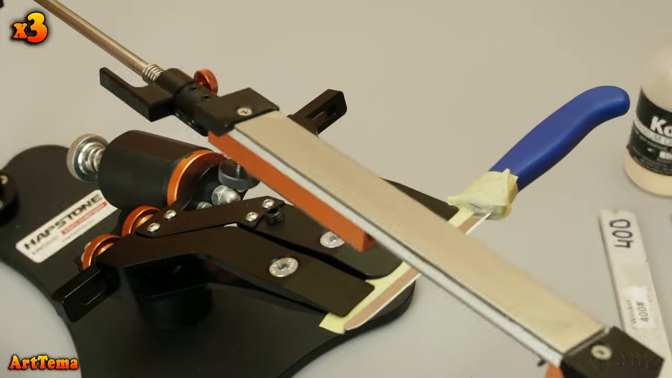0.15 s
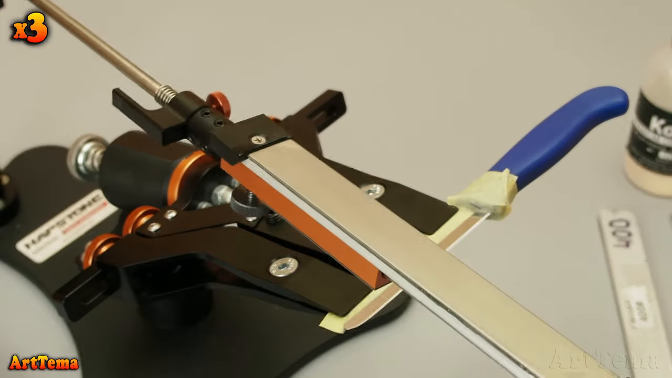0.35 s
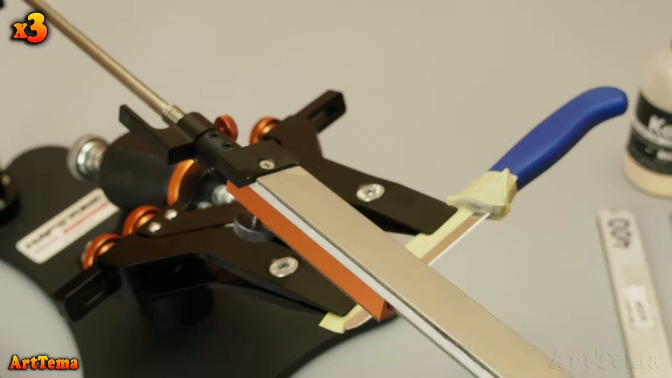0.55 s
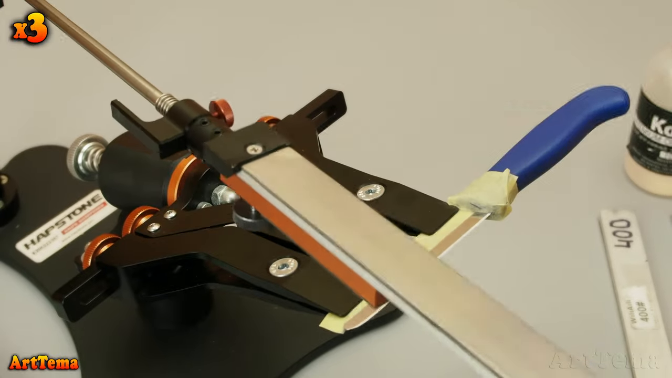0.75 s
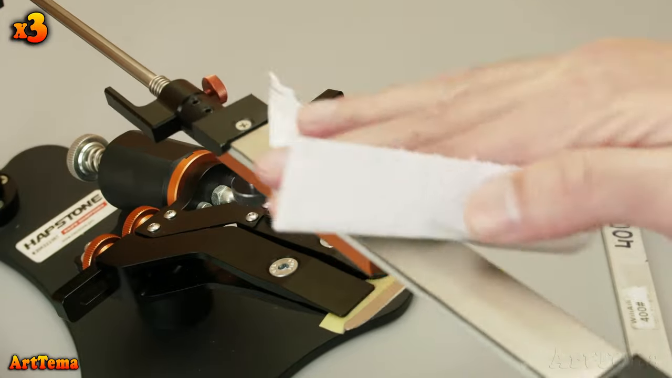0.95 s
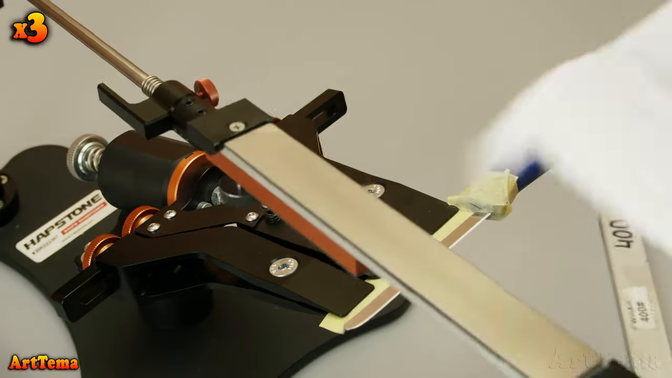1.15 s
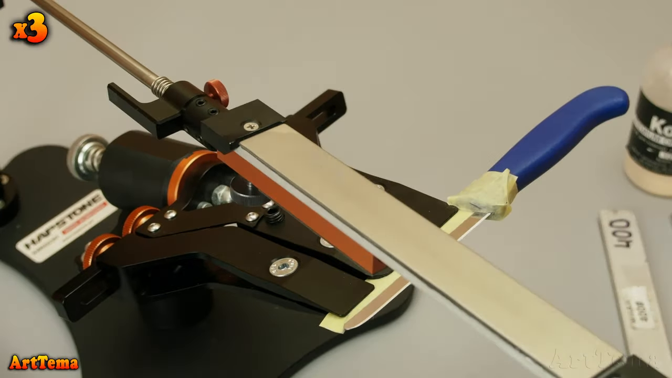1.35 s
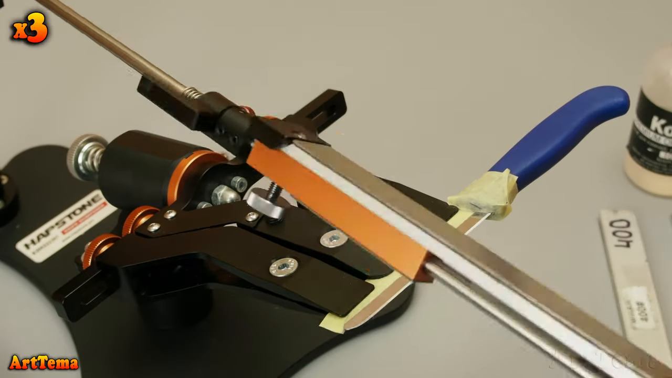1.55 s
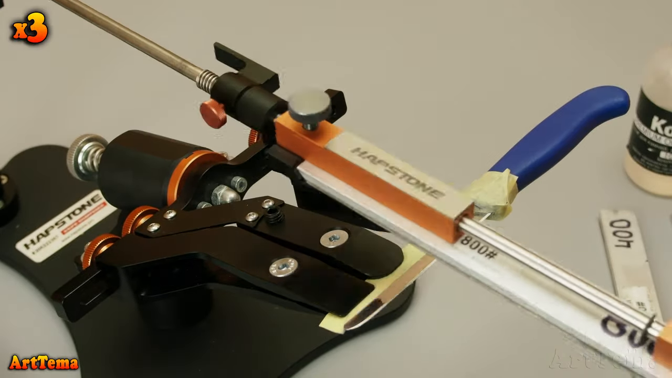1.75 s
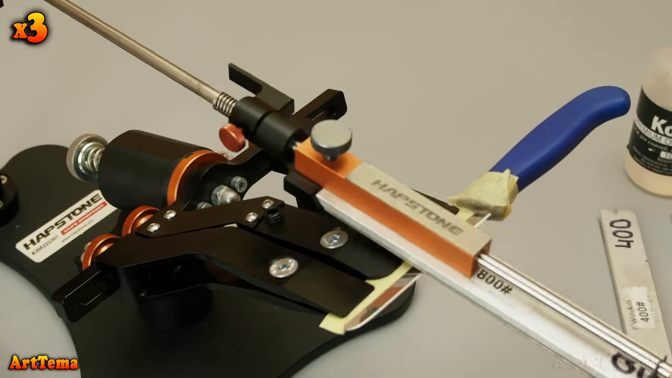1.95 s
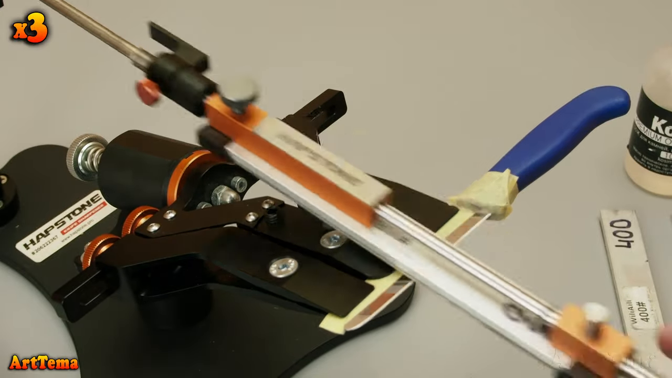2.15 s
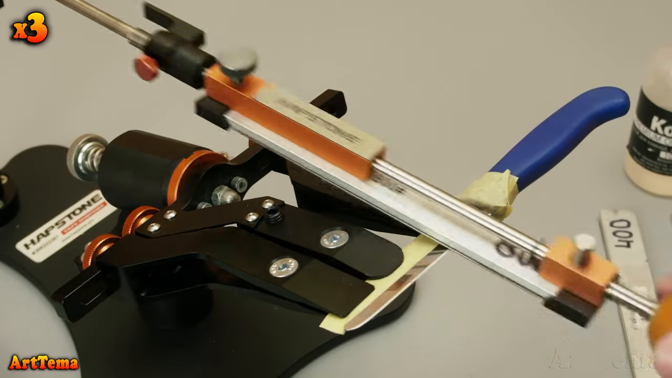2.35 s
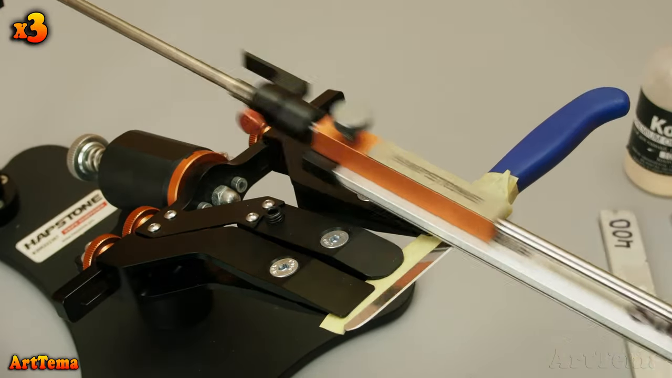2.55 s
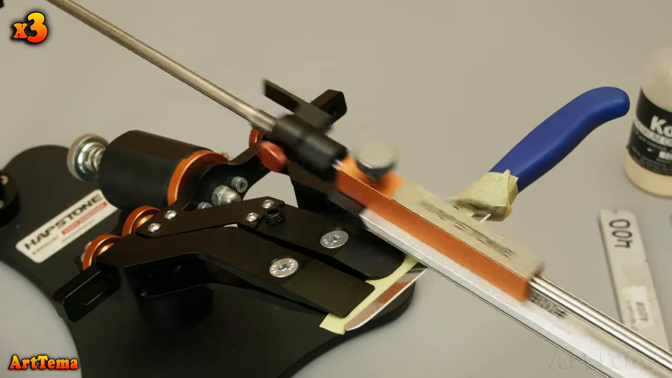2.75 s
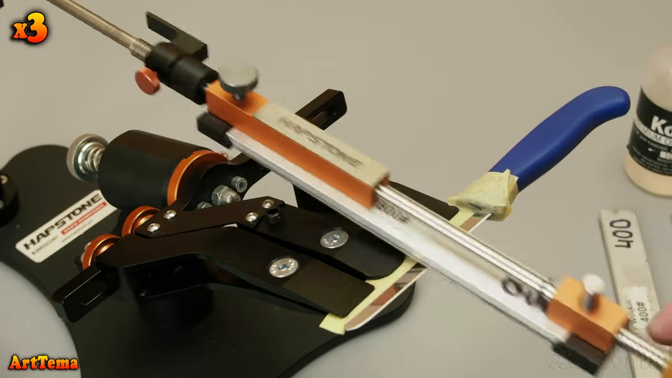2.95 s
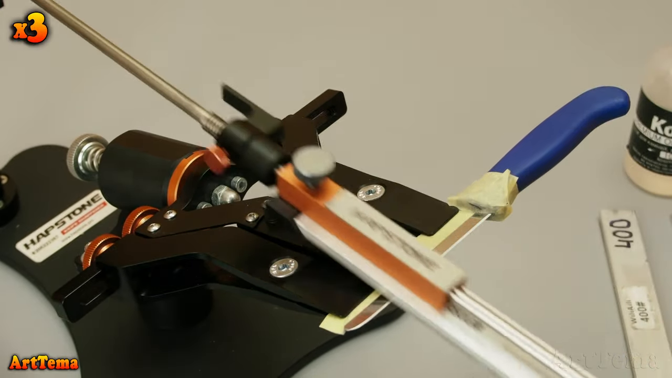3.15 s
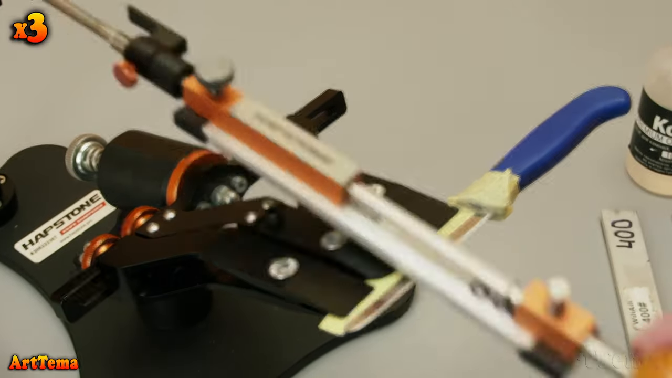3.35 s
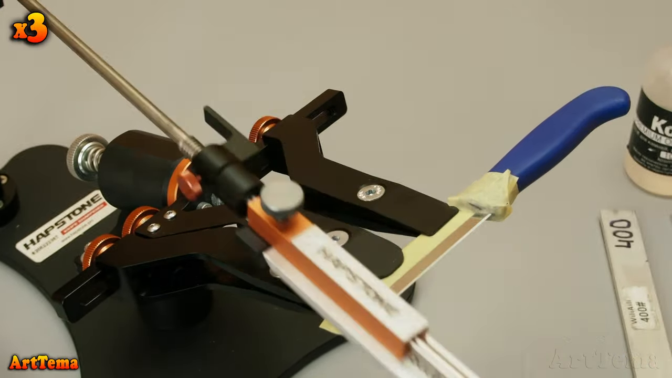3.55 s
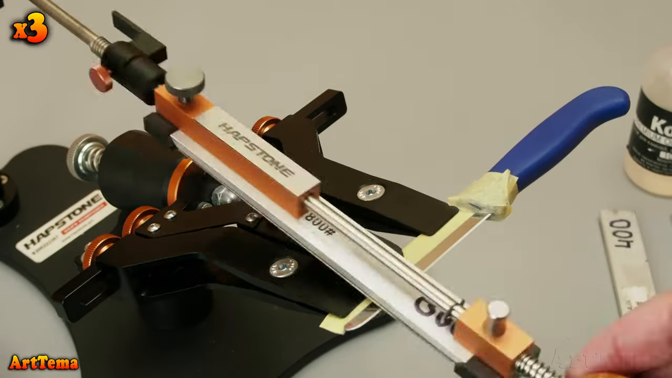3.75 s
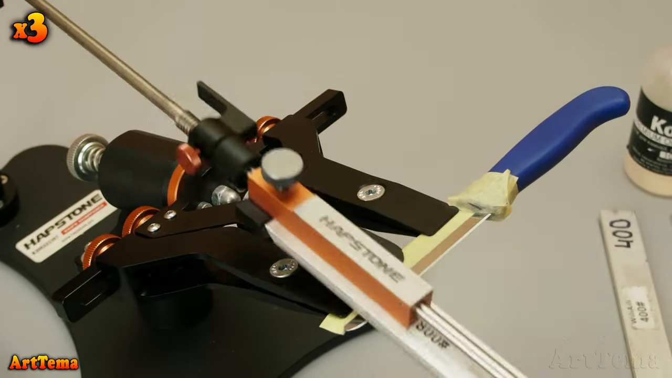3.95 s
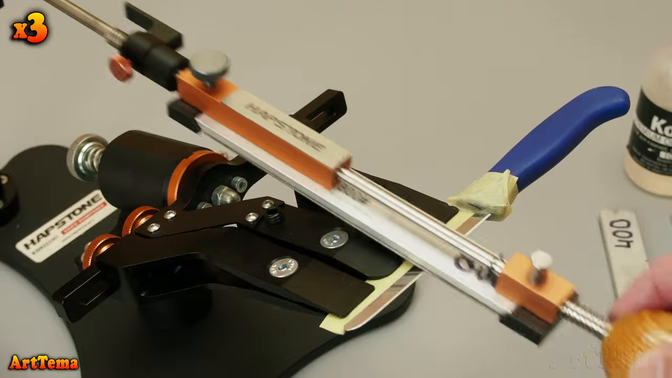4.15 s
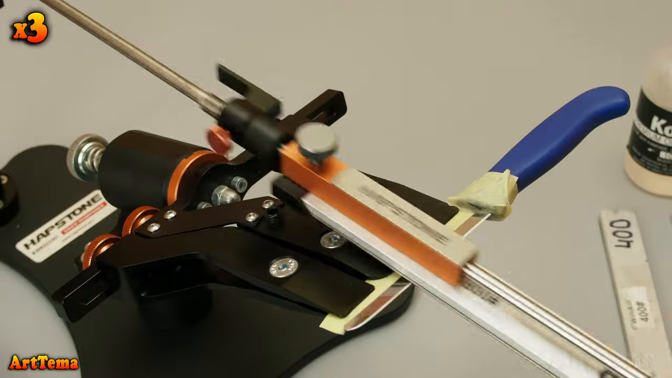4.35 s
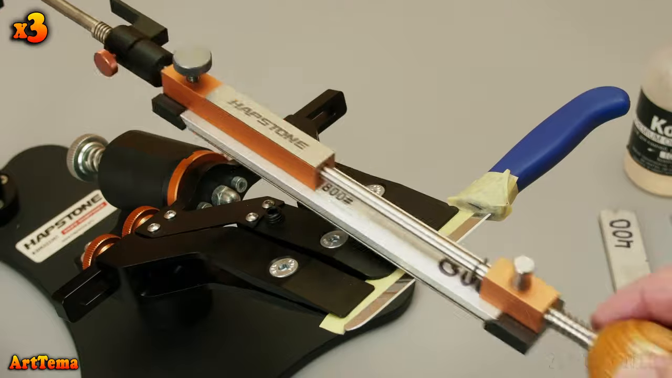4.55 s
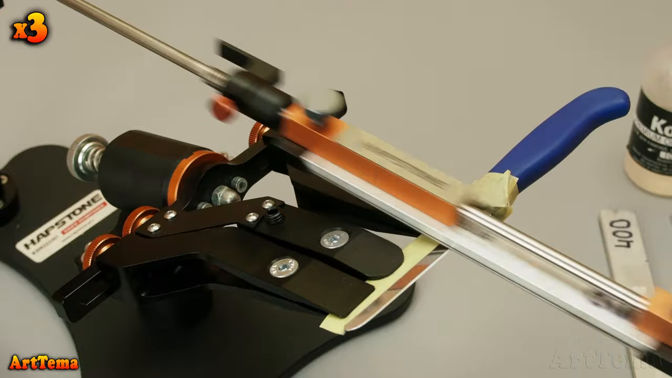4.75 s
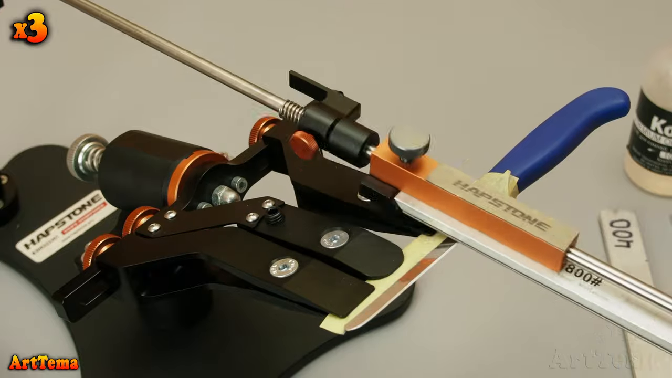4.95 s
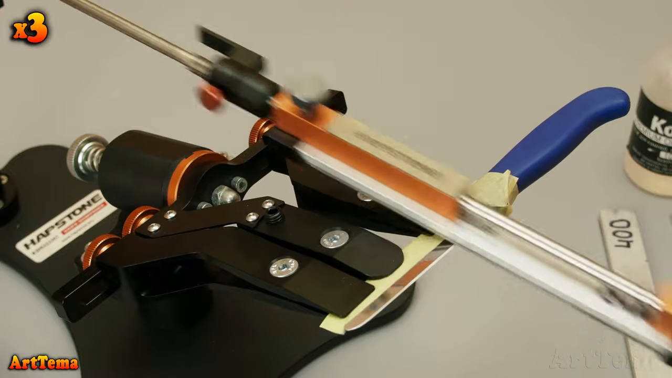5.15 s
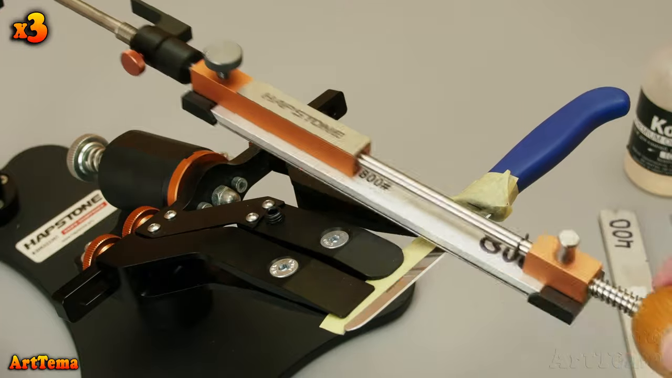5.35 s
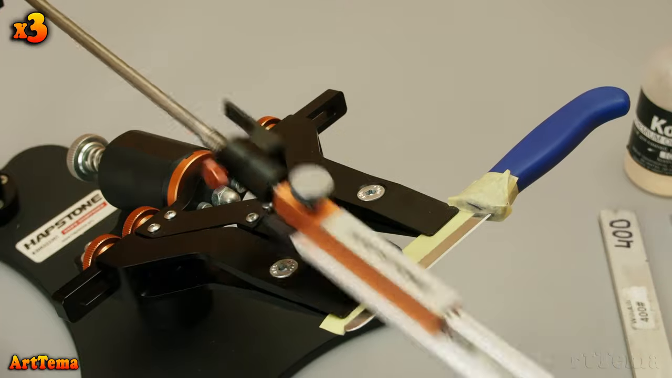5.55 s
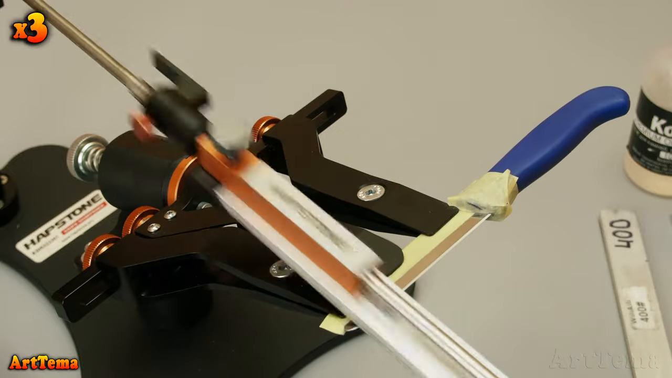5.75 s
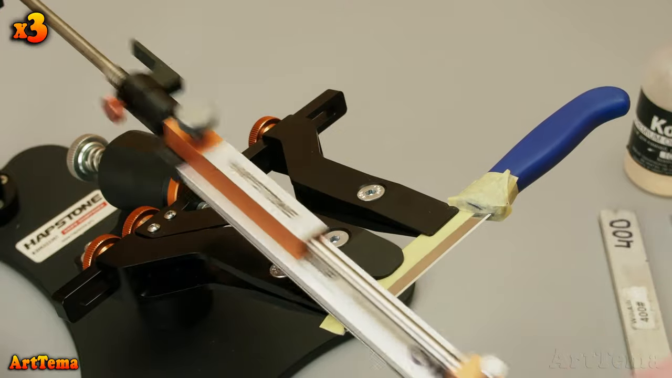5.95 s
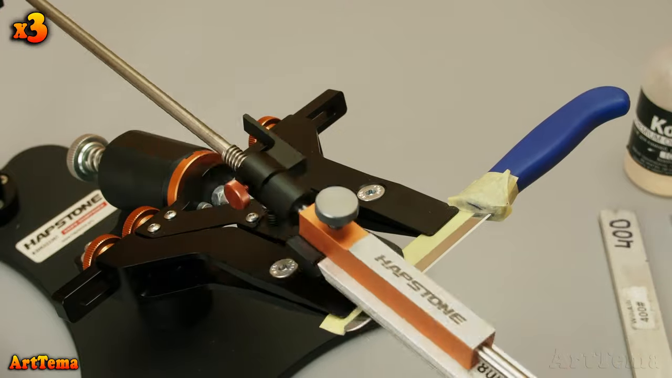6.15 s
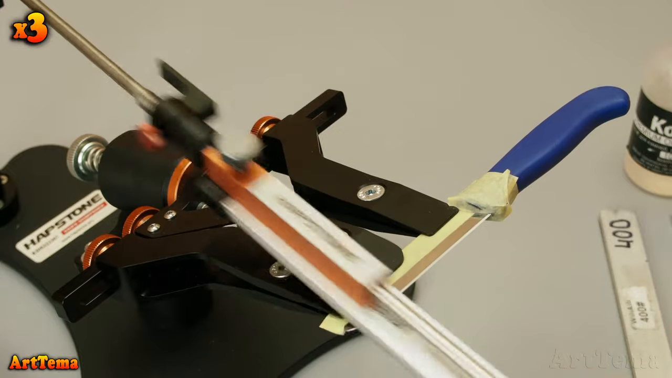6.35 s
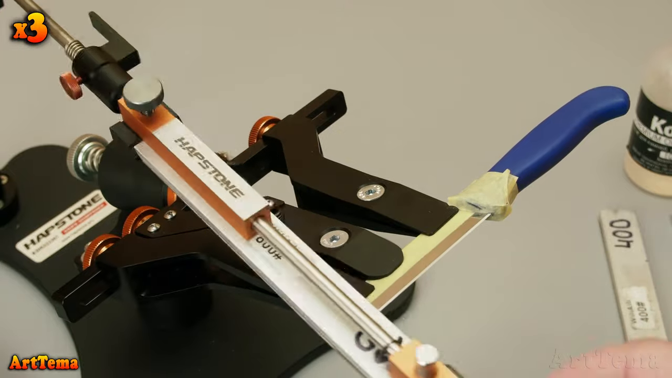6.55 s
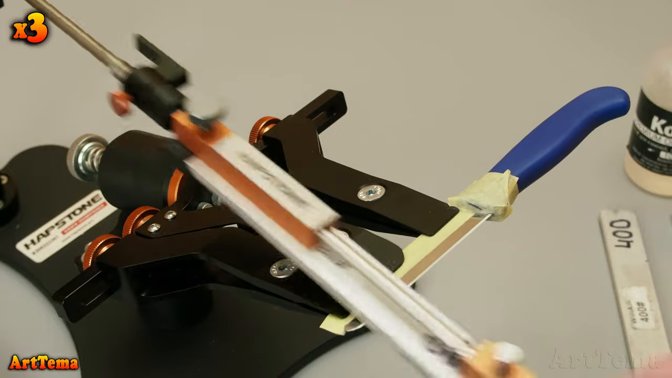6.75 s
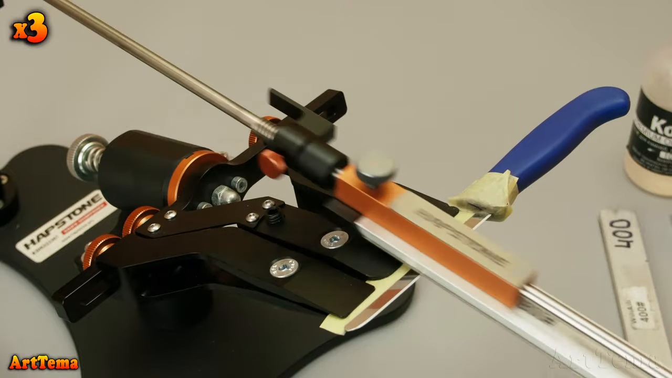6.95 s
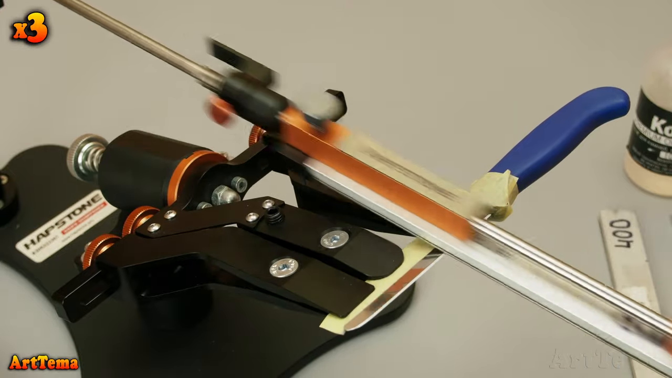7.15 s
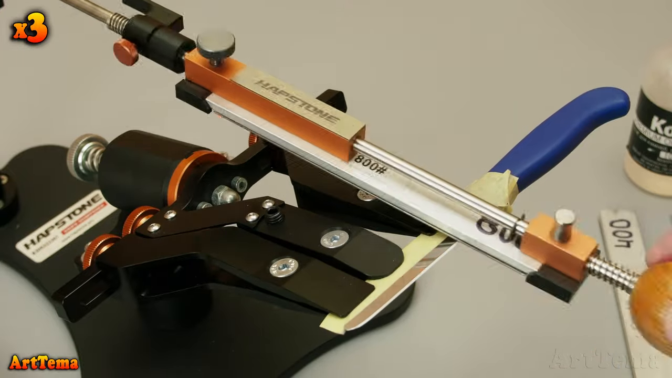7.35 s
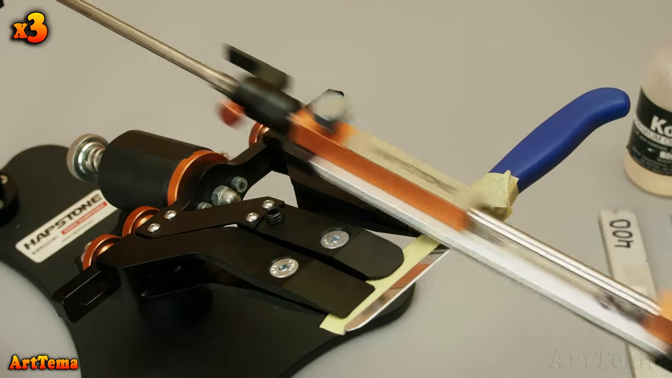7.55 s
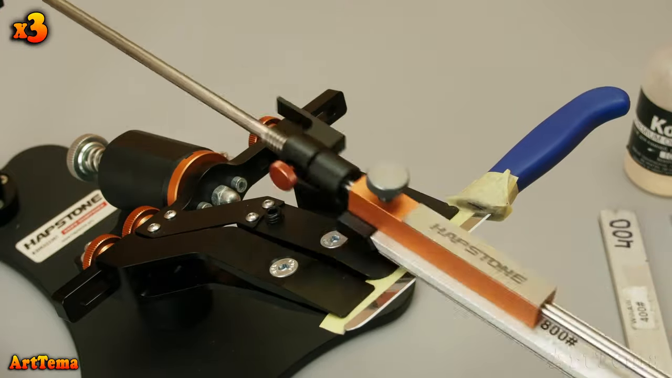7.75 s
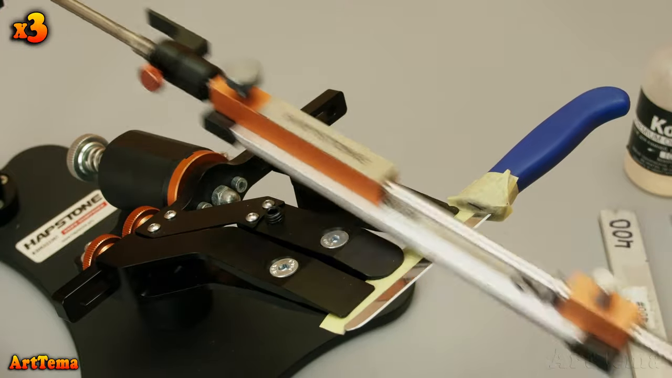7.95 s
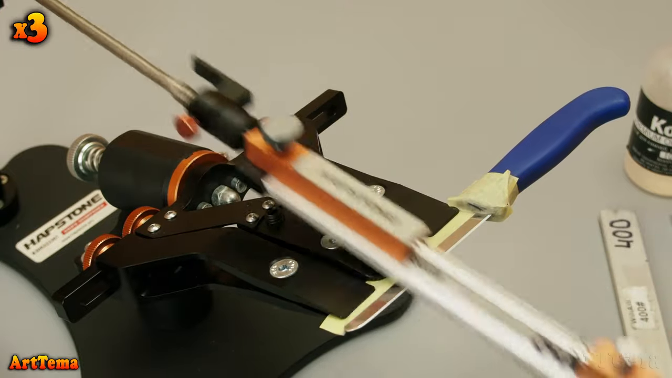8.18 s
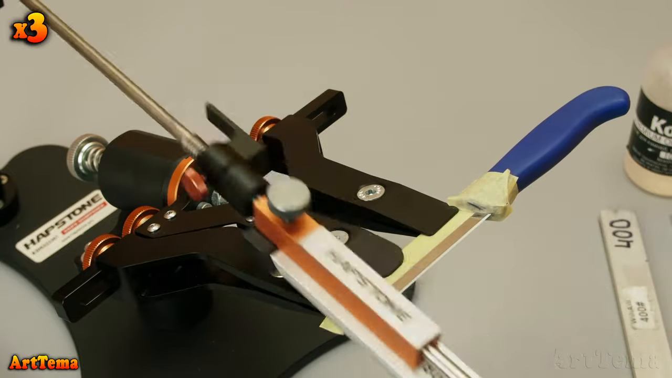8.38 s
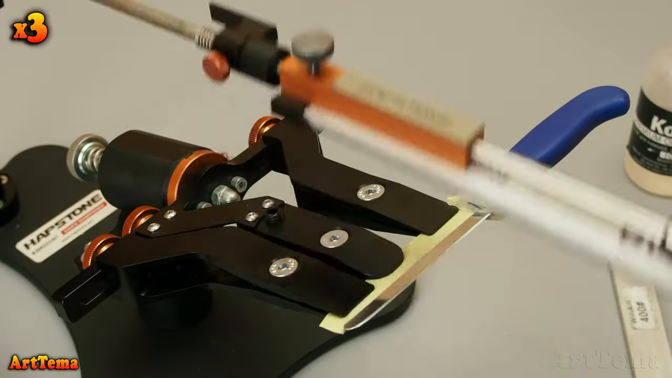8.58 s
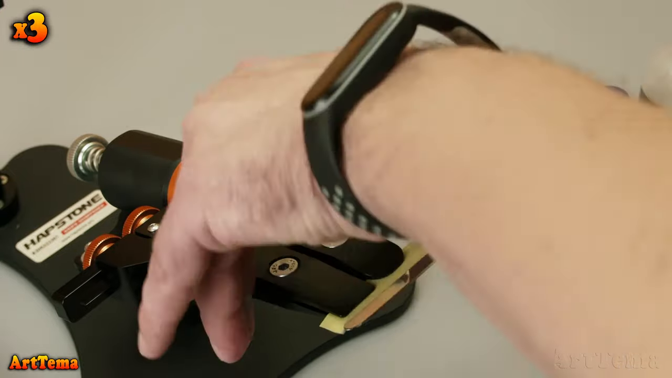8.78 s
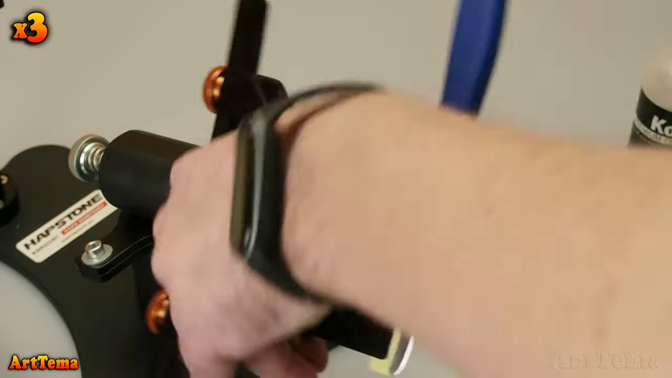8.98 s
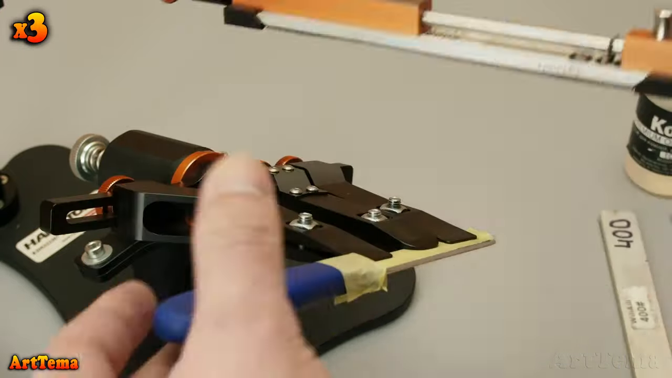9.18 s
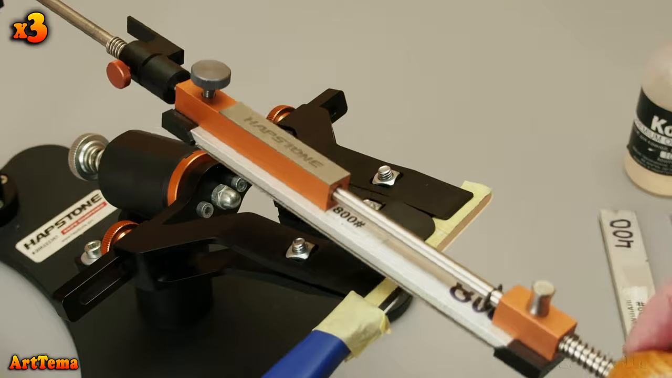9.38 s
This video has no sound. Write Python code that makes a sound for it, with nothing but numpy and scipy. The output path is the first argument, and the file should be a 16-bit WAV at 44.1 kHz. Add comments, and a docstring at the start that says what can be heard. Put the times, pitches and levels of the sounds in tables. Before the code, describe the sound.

A small quiet room with a low hush, heard close up in stereo at a workbench. For the first two seconds a cloth wipes faintly over a sharpening stone, with a few tiny ticks. At about 2 seconds the stone is set down on a clamped knife with a dull knock and starts rasping quickly back and forth, roughly thirteen short strokes a second. The gritty, hissing scrape is strongest at first, then swells and eases, with a thin, shifting ring from the steel blade. Underneath, the jig rumbles and knocks softly through the bench, and the hollow clamp gives brief low hums, mostly between 5 and 8 seconds. A sharp tick comes near 7.6 seconds. The strokes stop at about 8.6 seconds, followed by a small click and soft bumps. At about 9.4 seconds the turned clamp locks with a clack and thump, the loudest sound.

```python
"""A workbench in a small quiet room, heard from a close pair of microphones.
A stone on a guide rod is wiped with a cloth, set down on a clamped knife and worked quickly to and fro.
Grit rasps on steel and sets the blade ringing; the jig rumbles and knocks through the bench and jolts
the hollow clamp into short hums. At the end the clamp is turned over with a clack and a thump."""
import sys
import numpy as np
from scipy import signal
from scipy.fft import rfft, irfft, next_fast_len
from scipy.io import wavfile

SR = 44100
rng = np.random.default_rng(int(sys.argv[2]) if len(sys.argv) > 2 else 0)


def wav_record(signal):
    """Record a signal, one row per channel, as 16-bit PCM in the file named by sys.argv[1]."""
    frames = np.transpose(np.atleast_2d(signal))
    bounded = np.clip(frames, -1, 1)
    # unit amplitude maps onto the largest positive 16-bit level
    quanta = np.round(bounded * 32767).astype(np.int16)
    wavfile.write(sys.argv[1], SR, quanta)


N = 415422
TIME = np.arange(N) / SR
FFT_SIZE = next_fast_len(N + SR // 2)
LOG_HZ = np.log(np.maximum(np.arange(FFT_SIZE // 2 + 1) * SR / FFT_SIZE, 1))


def from_db(db):
    """Decibels to gain."""
    return np.exp(np.asarray(db) * np.log(10) / 20)


def unit_rms(x):
    """Scale to unit power."""
    return x / np.sqrt(np.mean(x ** 2) + 1e-20)


def over_time(rows):
    """Each level column as one value per sample; silence outside the table."""
    times, *columns = np.transpose(rows)
    return [np.interp(TIME, times, db, left=-200, right=-200) for db in columns]


def over_hz(rows):
    """A spectrum table as one value per FFT bin."""
    hz, value = np.transpose(rows)
    return np.interp(LOG_HZ, np.log(hz), value)


def shaped(x, response):
    """Filter by a frequency response."""
    return irfft(rfft(x, FFT_SIZE) * response, FFT_SIZE)[..., :N]


def filtered(x, kind, hz, order=4):
    """Butterworth filter."""
    return signal.sosfilt(signal.butter(order, hz, kind, fs=SR, output="sos"), x)


def drift(rate_hz):
    """A slow random wander with spread 1."""
    hop, settle = 40, 2000
    pole = np.exp(-2 * np.pi * rate_hz * hop / SR)
    noise = rng.standard_normal(N // hop + settle + 2)
    slow = signal.lfilter([1], [1, -2 * pole, pole * pole], noise)[settle:]
    return np.interp(np.arange(N) / hop, np.arange(len(slow)), unit_rms(slow))


def grains(uneven_db):
    """Dense tiny contacts of uneven size."""
    return unit_rms(rng.standard_normal(N) * from_db(uneven_db * np.minimum(rng.exponential(1, N), 5)))


def ring(force, hz, t60):
    """One mode: a unit click starts a dying sine of height 1."""
    r, w = from_db(-60 / (t60 * SR)), 2 * np.pi * hz / SR
    return signal.lfilter([0, np.sin(w)], [1, -2 * r * np.cos(w), r * r], force + 1e-18)


def ring_by_stroke(force, starts, pitches_hz, t60):
    """A mode that takes a new pitch on each stroke, always at unit power."""
    out, at = np.zeros_like(force), [round(start * SR) for start in starts]
    for begin, end, hz in zip(at, at[1:], pitches_hz):
        out[:, begin:end] = unit_rms(ring(force[:, begin:end], hz, t60))
    return out


def swelling_ring(times, db, hz, t60):
    """Jolts reach a resonance through another part, so the ring swells before it dies."""
    jolts = np.zeros(N)
    jolts[np.round(np.asarray(times) * SR).astype(int)] = from_db(db)
    peak = t60 * SR / (2 * np.e * np.log(1000))
    return ring(ring(jolts, hz, t60), hz, t60) / peak


# Strokes, close up; the stone lifts at the last row. Table levels are before each source's own gains.
# t/s, rasp/dB, hiss over the rasp/dB, rubbing at the opening turn/dB
STROKES = [(2.09, -44, -13, -65), (2.171, -34.5, 0.5, -51.5), (2.263, -31.5, 1, -44), (2.347, -44, 0, -49),
           (2.425, -47.5, -1.5, -57), (2.502, -53, -1.5, -62), (2.582, -50.5, 1, -60.5),
           (2.661, -53.5, -2, -56), (2.745, -42.5, -2.5, -55.5), (2.825, -44.5, -3, -55),
           (2.904, -48, 3, -74), (2.985, -47, 0.5, -57), (3.052, -49, -1.5, -66), (3.12, -50.5, -5.5, -66),
           (3.184, -53.5, 2, -63), (3.257, -50, 0, -59.5), (3.319, -49, -4.5, -58), (3.386, -50, -4, -46.5),
           (3.449, -56, 5, -59.5), (3.519, -62, 2, -52.5), (3.58, -65.5, 6.5, -72),
           (3.65, -60.5, -1.5, -60.5), (3.711, -55.5, -1, -79), (3.771, -47, -10.5, -54),
           (3.837, -57, -2, -68.5), (3.901, -54, -5, -53), (3.969, -54.5, -1, -59.5),
           (4.035, -52.5, 0.5, -59), (4.099, -53, 2, -54.5), (4.164, -46, -5, -65),
           (4.226, -45.5, 0.5, -57), (4.29, -52, 1, -57), (4.359, -48, 3, -54.5), (4.428, -47.5, -4, -60),
           (4.501, -42.5, 2.5, -54.5), (4.578, -48, -2.5, -54), (4.645, -44, -3, -60.5),
           (4.721, -51.5, 3, -59), (4.793, -53, 2.5, -58.5), (4.878, -59.5, 1.5, -60),
           (4.961, -57.5, 3, -64), (5.042, -61, 3.5, -70), (5.12, -49.5, 2, -73), (5.198, -52.5, -1, -56.5),
           (5.278, -44, 3, -58.5), (5.353, -50, -0.5, -58.5), (5.435, -47.5, 0, -65),
           (5.508, -50, -3.5, -61), (5.581, -51, 2, -57), (5.657, -54, -3, -58), (5.731, -58, 1, -65.5),
           (5.806, -55, 1, -61), (5.872, -67.5, 10.5, -74), (5.945, -65, 2.5, -67),
           (6.019, -62.5, 0.5, -61.5), (6.087, -64, -0.5, -63.5), (6.167, -53, 5.5, -67.5),
           (6.243, -54, -1, -64.5), (6.318, -53.5, -2.5, -58), (6.403, -48.5, -3.5, -67),
           (6.485, -50.5, -1, -57), (6.565, -50.5, -5, -62.5), (6.648, -51, 2.5, -60.5),
           (6.732, -54.5, 0, -61.5), (6.812, -50, 0.5, -63.0), (6.894, -56, 5, -59),
           (6.973, -44.5, -0.5, -62), (7.053, -51.5, 3.5, -58.5), (7.126, -44, -2, -62),
           (7.209, -56, 3, -61), (7.284, -55, 1, -64), (7.369, -56, -3, -62), (7.446, -50.5, -2, -66),
           (7.525, -53.5, -4, -63), (7.602, -44, 0, -68), (7.68, -51.5, -1.5, -60), (7.76, -46, 1, -67),
           (7.838, -51, 0, -54.5), (7.911, -46.5, 1, -65.5), (7.995, -49.5, 0.5, -56),
           (8.07, -47.5, 0, -61.5), (8.151, -52.5, -1, -59), (8.232, -48.5, -5.5, -62.5),
           (8.311, -55, -3, -60), (8.385, -47.5, 0, -60.5), (8.463, -57, 0.5, -54), (8.541, -50, -4.5, -66),
           (8.609, -76.5, -3, -56)]
JIG_SCRAPE = [(2.05, -68), (2.6, -58), (3.1, -60), (3.6, -65), (4.1, -63), (4.7, -62.5), (5.1, -53.5),
              (5.5, -61.5), (5.8, -61), (6.3, -61), (7.1, -59), (7.6, -59), (8.65, -62)]   # scrape under a usual stroke, along the blade: t/s, level/dB
GRIT_SPECTRUM = [(350, 3.5), (700, -2.5), (1150, 17.5), (1600, -12.5), (2400, 3), (3300, 16), (4950, -2),
                 (5500, 14), (9000, 3), (15700, 0)]   # grit on steel: f/Hz, level/dB
BAND_EDGES = [550, 1900, 4600, 8500, 17000]   # bounds of grind, scrape, rasp and hiss: f/Hz
BAND_CHATTER = [4, 3, 2.2, 2.8]   # lumpiness of each band: spread/dB
BAND_RUBBING = [-29, -1.5, -1.5, -7]   # each band's share of the dull rubbing at a turn: level/dB


def stone(jolts):
    """Grit rasps on steel, loud while the stone moves and sinking to a rub at each turn."""
    starts, rasp_db, hiss_db, turn_db = np.transpose(STROKES)
    usual_scrape_db, usual_rasp_db = np.interp(starts, *np.transpose(JIG_SCRAPE)), -52
    scrape_db = usual_scrape_db + .23 * (rasp_db - usual_rasp_db) - .59 * hiss_db
    bands_db = [scrape_db - 11.5, scrape_db, rasp_db, rasp_db + hiss_db]
    stroke = np.clip(np.searchsorted(starts, TIME) - 1, 0, len(starts) - 2)
    progress = (TIME - starts[stroke]) / np.diff(starts)[stroke]
    touching = (progress > 0) & (progress < 1)
    speed = np.clip(1.5 * np.sin(np.pi * progress) - .18, 0, 1)   # sticks at the turn, then breaks free
    # a stroke leans towards the end where the stone keeps its weight
    lean_db = .84 * np.diff(turn_db)[stroke] * (progress - .5)
    rubbing = from_db(np.interp(TIME, starts, turn_db) - 4) * touching
    # a wide contact patch: in the treble each microphone favours other grains
    side_grit = filtered(grains(uneven_db=2.5), "high", 2600, order=2)
    grit = grains(uneven_db=4.5) + from_db(-4) * side_grit * [[1], [-1]]
    # the thin edge takes up little bass, and is driven out of step with the surface hiss
    edge_force = filtered(np.roll(grit, SR, axis=1), "high", 600)
    steel = unit_rms(shaped(grit, from_db(over_hz(GRIT_SPECTRUM))))
    steel += lesser_modes(edge_force, starts, stroke) + blade(edge_force, starts, stroke)
    out = np.zeros((2, N))
    for k, band_hz in enumerate(zip(BAND_EDGES, BAND_EDGES[1:])):
        chatter_db = BAND_CHATTER[k] * (drift(15) if k else jolts)
        sliding = from_db(bands_db[k][stroke] + lean_db + chatter_db) * speed * touching
        envelope = np.hypot(sliding, rubbing * from_db(BAND_RUBBING[k]))
        out += unit_rms(filtered(steel, "band", band_hz)) * envelope
    return out


# The clamped blade's modes: f/Hz, width/Hz, level/dB, family (0 heel, 1 belly, 2 high)
BLADE_MODES = [(2230, 37, -18, 1), (2263, 43, -11.5, 0), (3340, 150, 0, 1), (3780, 47, -3, 0),
               (4050, 80, -7, 0), (4430, 280, -6.5, 0), (4460, 200, -12, 1), (5710, 120, -5, 1),
               (5960, 140, 4.5, 0), (6500, 66, -7.5, 0), (10040, 350, -17, 0), (7320, 140, -7, 2),
               (8580, 200, -11.5, 2), (9440, 190, 1.5, 2), (9760, 120, -0.5, 2), (12400, 280, -9, 2)]
FAMILY_RINGING = [(2.05, -15, -8, 6), (2.5, -7.5, 8.5, -10.5), (3.2, -21, -9, -4.5), (3.6, 20, -5, 3.5),
                  (4.1, -3, -30, -10), (4.6, -12.5, -7, -3.5), (5.0, 9.5, 13.5, -18.5),
                  (5.6, -13.5, -8, -4.5), (5.8, 19.5, -14.5, 0), (6.4, 9.5, -30, -2.5),
                  (6.9, 3.5, -19.5, -10.5), (7.3, -1.5, 17, -13), (7.9, -1, -14, -3.5),
                  (8.3, -4.5, -9.5, -0.5), (8.65, 6.5, -11.5, -13)]   # how freely each family rings: t/s, heel/dB, belly/dB, high/dB
FAMILY_DETUNE = [.007, .012, .012]   # pitch from stroke to stroke: spread/fraction
FAMILY_CONTACT = [2.5, 4, 3.5]   # contact from stroke to stroke: spread/dB


def blade(force, starts, stroke):
    """The blade's modes wax and wane as the stone wanders; each stroke meets the edge anew."""
    freedom = from_db(over_time(FAMILY_RINGING))
    out = np.zeros((2, N))
    for hz, width_hz, db, family in BLADE_MODES:
        pitches = hz * np.exp(rng.normal(0, FAMILY_DETUNE[family], len(starts)))
        mode = ring_by_stroke(force, starts, pitches, t60=np.log(1000) / (np.pi * width_hz))
        contact_db = 4 * drift(35) + rng.normal(0, FAMILY_CONTACT[family], len(starts))[stroke]
        out += mode * freedom[family] * from_db(db - 12.5 + contact_db)
    return out


def lesser_modes(force, starts, stroke):
    """Weaker blade modes flare briefly, at other pitches on every stroke."""
    ring_cycles = 55
    out = np.zeros((2, N))
    for hz in np.geomspace(1300, 13000, 14):
        db = np.interp(np.log(hz), np.log([1300, 3500, 13000]), [-29, -14, -21])
        flare_db = 9 * np.tanh(.5 * drift(30) + rng.normal(0, .4, len(starts))[stroke])
        pitches = hz * np.exp(rng.normal(0, .07, len(starts)))
        out += ring_by_stroke(force, starts, pitches, t60=ring_cycles / hz) * from_db(db + flare_db)
    return out


BENCH_MODES = [(71.3, -19, 0.15), (108, 1, 0.1), (135, 4.5, 0.078), (208.3, 1, 0.07), (258.3, -8, 0.13),
               (328.8, 6, 0.06), (417, 6.5, 0.02), (494, -3.5, 0.093), (628, -1.5, 0.027),
               (780, -16, 0.024), (960, -29.5, 0.069)]   # the bench under the jig: f/Hz, level/dB, t60/s
JIG_RUMBLE = [(.5, -80), (.8, -78), (1.4, -97), (2.0, -65), (2.4, -61.5), (3.7, -61), (4.3, -62.5),
              (5.0, -59.5), (5.9, -58), (6.8, -57), (7.2, -59), (8.4, -57), (8.7, -73.5), (9.42, -89.5)]   # the jig shaking the bench: t/s, level/dB
BENCH_KNOCKS = [(0.746, -57, -4), (1.206, -60, -2), (1.272, -70, -8), (1.292, -75, 15.5),
                (1.338, -78, 16.5), (1.467, -78.5, 21), (1.97, -23, -19.5), (2.178, -41, -26.5),
                (2.713, -42.5, -14.5), (2.786, -40, -31), (3.31, -41, -29), (3.441, -36, -30),
                (3.512, -38.5, -25), (3.637, -41, -19), (3.765, -49.5, 0.5), (3.895, -34.5, -24),
                (4.155, -38, -51), (4.287, -35.5, -52), (4.517, -47.5, -10), (4.906, -50, -13),
                (4.998, -38, -16.5), (5.082, -46, -2.5), (5.239, -37.5, -9.5), (5.716, -34.5, -54),
                (5.988, -35, -52), (6.401, -34, -57), (6.563, -38, -37), (7.479, -35, -37),
                (7.541, -38.5, -13), (7.736, -49, -2), (8.306, -38, -37), (8.377, -50, -25),
                (9.032, -38.5, -19), (9.132, -54, -8), (9.163, -41.5, -34), (9.3612, -22, -27),
                (9.36, -13, -21), (9.371, -27, -38)]   # dull knocks: t/s, level/dB, tilt towards the upper modes/dB


def bench(jolts):
    """Steady shaking and single padded knocks drive the same bench modes."""
    times, knock_db, tilt_db = np.transpose(BENCH_KNOCKS)
    at = np.round(times * SR).astype(int)
    scatter_db = rng.normal(0, .14, (len(times), len(BENCH_MODES)))
    rumble_db, = over_time(JIG_RUMBLE)
    shaking = from_db(rumble_db - 30.5 + 3.5 * np.tanh(jolts))
    pad = np.hanning(round(.0021 * SR))   # a soft contact spreads the blow
    out = np.zeros(N)
    for k, (hz, mode_db, t60) in enumerate(BENCH_MODES):
        height = np.clip(np.log2(hz / 113) / 2, 0, 1)   # 0 for low modes, 1 for upper ones
        blow_db = knock_db - 6.5 + scatter_db[:, k] + (tilt_db + 18.5) * height
        blows = np.zeros(N)
        blows[at] = from_db(blow_db) * (-1) ** k   # the bench flexes both ways
        knocks = signal.oaconvolve(blows, pad / pad.sum())[:N]
        rattle = from_db(4.5 * np.tanh(drift(10.1)) - .5 * height ** 3) * rng.standard_normal(N)
        out += ring(shaking * rattle + knocks, hz, t60) * from_db(mode_db)
    return out


CLAMP_JOLTS = [(0.428, -57), (1.068, -57), (3.62, -51), (3.742, -46.5), (5.172, -45.5), (5.414, -48),
               (5.816, -34.5), (5.977, -49), (6.068, -40), (6.194, -45), (6.35, -45), (6.5, -42.5),
               (6.576, -44.5), (6.654, -43), (6.73, -49), (6.835, -47), (6.983, -44), (7.377, -42),
               (7.938, -44), (8.261, -44.5)]   # jolts reaching the clamp: t/s, level/dB


def clamp_hum():
    """Jolts pass through the base and set the hollow clamp body humming briefly."""
    times, db = np.transpose(CLAMP_JOLTS)
    return swelling_ring(times - .004, db - 3.5, hz=339.5, t60=.064)


def base_thump():
    """The heavy base takes the weight of the turned clamp as it locks."""
    return swelling_ring(times=9.3592, db=-13, hz=205, t60=.065)


PART_TICKS = [(0.748, -49, 0.02, 2980), (0.904, -56, 0.06, 3180), (1.669, -58.5, 0.089, 3220),
              (7.624, -39, 0.042, 3720), (8.837, -32.5, 0.0027, 2300), (9.029, -60, 0.033, 2980),
              (9.3629, -17, 0.016, 2600), (9.363, -18, 0.02, 700)]   # metal and plastic parts meeting: t/s, level/dB, t60/s, colour f/Hz


def ticks():
    """Hard parts meet in a crack of noise around their own colour, with a weaker, longer tail."""
    out, age = np.zeros(N + SR // 5), np.arange(SR // 5) / SR
    rise = 1 - np.exp(-age / .0008)
    for start, db, t60, hz in PART_TICKS:
        burst = unit_rms(filtered(rng.standard_normal(len(age)), "band", [hz / 3, hz * 1.9], order=2))
        decay_db = -60 * age / t60
        crack, tail = from_db(decay_db), from_db(-14 + decay_db / 5)
        at = round(start * SR)
        out[at:at + len(age)] += burst * rise * from_db(db - 3) * (crack + tail)
    return out[:N]


CLOTH_WIPES = [(0.558, 0.3, -64.5, -69), (0.886, 0.031, -65.5, -64.5), (0.941, 0.095, -62.5, -62.5),
               (0.974, 0.17, -61, -55.5), (1.075, 0.51, -68, -72), (1.26, 0.069, -67, -64.5),
               (1.445, 0.13, -59, -61.5), (1.532, 0.11, -65.5, -69), (1.71, 0.29, -67, -72.5),
               (1.989, 0.045, -64, -63), (2.019, 0.089, -68, -75), (8.644, 0.17, -72.5, -99),
               (9.21, 0.039, -71.5, -75)]   # cloth and hands sliding, close up: t/s, length/s, rustle/dB, treble/dB
CLOTH_SPECTRUM = [(350, 5.5), (800, -7), (1500, -6), (3200, 2.5), (4800, -7), (7000, -18), (15700, -29.5)]   # rubbing fibres: f/Hz, level/dB


def cloth():
    """Soft fibres slide and crease: each wipe swells and fades, its bands crinkling separately."""
    fibres = shaped(grains(uneven_db=4.5), from_db(over_hz(CLOTH_SPECTRUM)))
    edges_hz = [350, 1500, 2600, 4000, 6000]
    rustle = unit_rms(sum(filtered(np.roll(fibres, low), "band", [low, high]) * from_db(3.3 * drift(35))
                          for low, high in zip(edges_hz, edges_hz[1:])))
    treble = unit_rms(filtered(fibres, "band", [6000, 17000]))
    out = np.zeros(N)
    for start, length, rustle_db, treble_db in CLOTH_WIPES:
        at = slice(round(start * SR), round((start + length) * SR))
        progress = np.clip((TIME[at] - start) / length, 0, 1)
        swell = np.sin(np.pi * progress ** .89) ** 1.34
        out[at] += swell * (rustle[at] * from_db(rustle_db) + treble[at] * from_db(treble_db))
    return out * from_db(1.8 * drift(40))


LEFT_PHASE = [(300, -0.05), (1000, -0.59), (4570, -0.77), (5680, 1.9), (7300, 1.15), (9820, 1.68),
              (13000, -0.74)]   # left microphone ahead of the right: f/Hz, phase/rad
LEFT_LEVEL = [(950, 3), (3770, 2), (15000, 1.5)]   # left microphone over the right: f/Hz, level/dB
REFLECTIONS = [(60, -26), (500, -20), (2000, -15), (6000, -14), (15000, -14)]   # the room against the direct sound: f/Hz, level/dB


def microphones(x):
    """The close pair: each hears the direct sound at its own phase and level, plus short reflections."""
    age, room_t60 = np.arange(SR // 4) / SR, .06
    echoes = rng.standard_normal((2, len(age))) * from_db(-60 * age / room_t60) * (age > .0015)
    echoes /= np.sqrt(np.sum(echoes ** 2, axis=1, keepdims=True))
    reflected = from_db(over_hz(REFLECTIONS)) * rfft(echoes, FFT_SIZE)
    side = np.array([[.5], [-.5]])
    direct = np.exp(1j * side * over_hz(LEFT_PHASE))
    # the bench top's reflection cancels the direct sound in a narrow dip
    octaves_from_dip = (LOG_HZ - np.log(1124)) / np.log(2)
    dip_db = -10.5 * np.exp(-.5 * (octaves_from_dip / .08) ** 2)
    pair = shaped(x, from_db(dip_db + side * over_hz(LEFT_LEVEL)) * (direct + reflected))
    return pair * from_db(side * drift(22))   # the work wanders in front of the microphones


ROOM_SPECTRUM = [(12, -48), (20, -17.5), (158, -5), (308, -7), (430, -13.5), (553, -17), (751, -21),
                 (840, -22), (1110, -27.5), (7600, -32), (15700, -42)]   # the quiet room: f/Hz, level/dB
ROOM_COHERENCE = [(60, 0.59), (240, 0.75), (950, 0.14), (3000, 0)]   # hush across the pair: f/Hz, shared power/fraction


def room_tone():
    """The low hush of the room, partly shared by both microphones and a little louder on the left."""
    coherence = over_hz(ROOM_COHERENCE)
    colour = from_db(over_hz(ROOM_SPECTRUM))
    shared = shaped(rng.standard_normal(N), colour * np.sqrt(coherence))
    separate = shaped(rng.standard_normal((2, N)), colour * np.sqrt(1 - coherence))
    return unit_rms(shared + separate) * from_db(-63 + 1.2 * drift(3)) * from_db([[.8], [-.8]])


def scene():
    """The work at the bench, close to the pair, over the hush of the room."""
    jolts = drift(25)   # the same small jolts shake the bench and the coarse grinding
    work = stone(jolts) + bench(jolts) + clamp_hum() + base_thump() + ticks() + cloth()
    return microphones(work) + room_tone()


def record(dry):
    """A steep low-pass, 80 dB down from 16050 Hz."""
    return signal.sosfilt(signal.cheby2(24, 80, 16050, fs=SR, output="sos"), dry)


dry = scene()
out = record(dry)
wav_record(out)
```